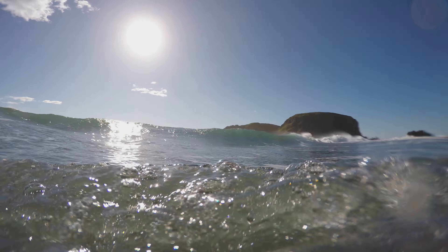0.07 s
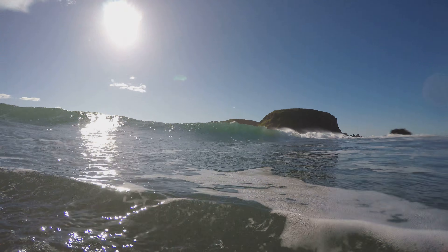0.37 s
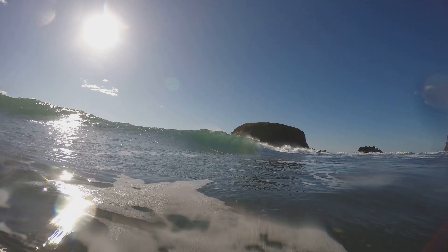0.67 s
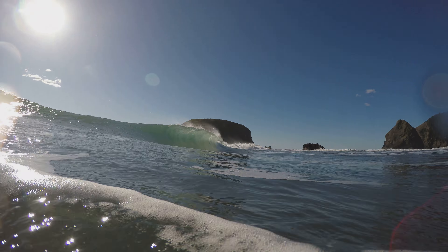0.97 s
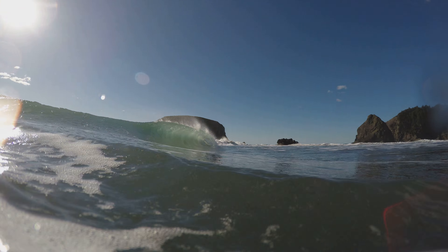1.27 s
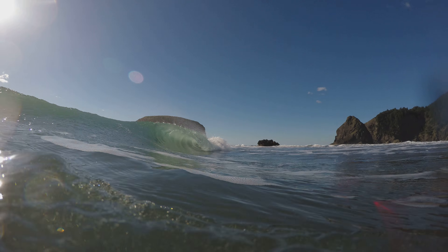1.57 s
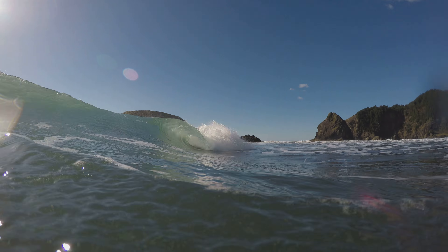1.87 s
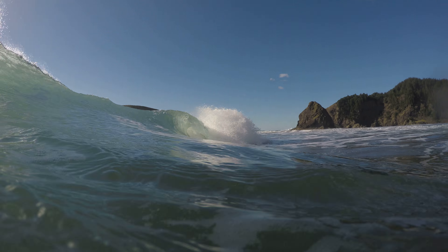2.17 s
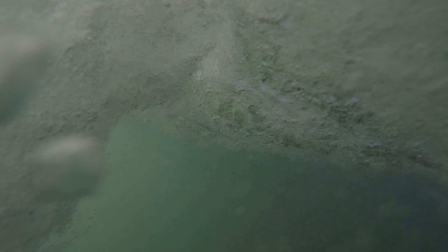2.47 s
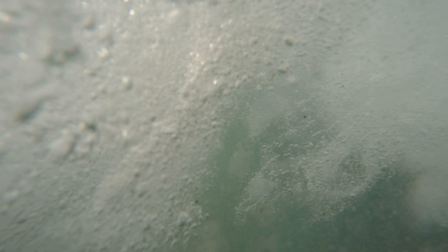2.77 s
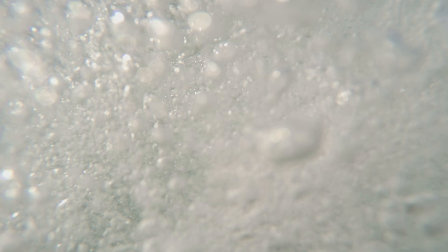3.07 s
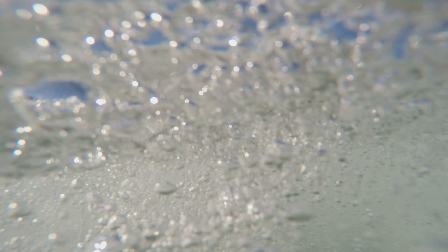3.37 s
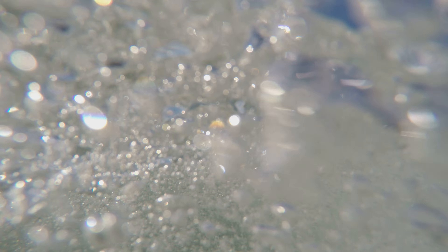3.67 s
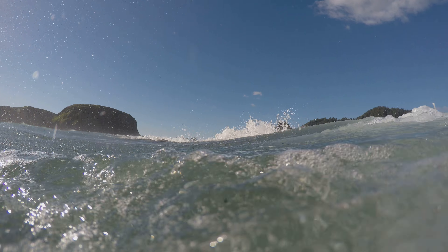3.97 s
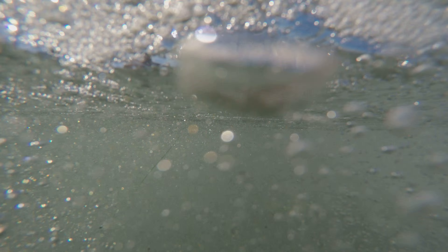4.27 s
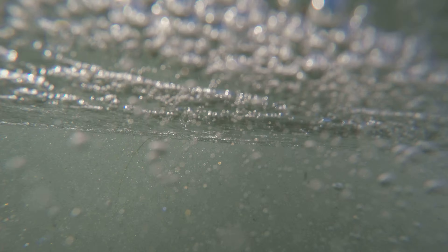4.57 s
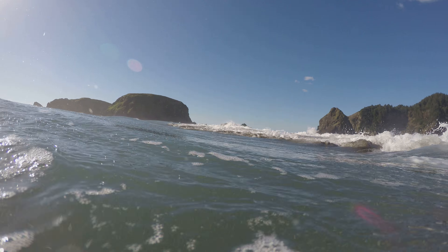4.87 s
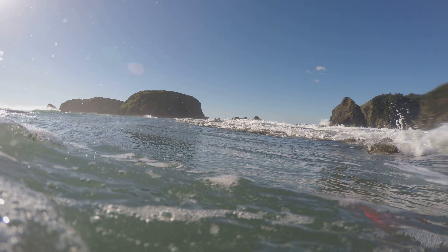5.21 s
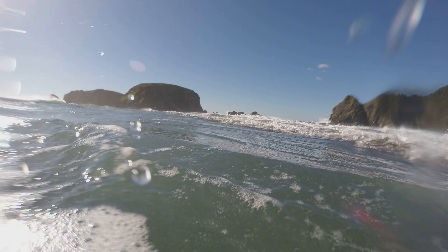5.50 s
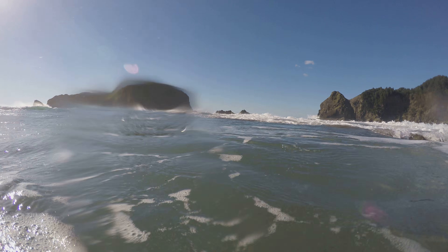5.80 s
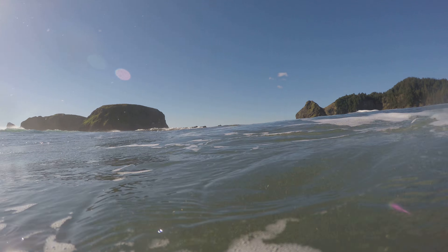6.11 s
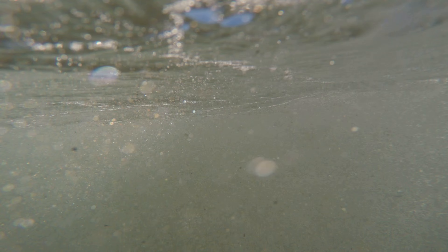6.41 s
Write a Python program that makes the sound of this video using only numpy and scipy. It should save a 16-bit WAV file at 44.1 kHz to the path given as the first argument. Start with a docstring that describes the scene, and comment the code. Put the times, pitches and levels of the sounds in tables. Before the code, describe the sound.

Small ocean ripples slap and plink against a microphone floating in the surf, over a low rumble and the hiss of distant breakers. A wave approaches with a hollow hiss and crashes right on top of it. The microphone goes under several times amid gurgling bubbles, crackling spray and deep thumps. It surfaces into softly fizzing foam, and more water slaps it near the end.

```python
"""A camera floats in the surf off a rocky coast. Over a low rumble and the hiss of distant breakers,
ripples slap its housing and trap ringing air pockets. A wave nears, curls with a hollow hiss and
breaks over it at 2.3 s: spray batters the case, then it is dragged under four times through clouds
of gurgling bubbles. By 5 s it has surfaced among hissing foam, a patch of froth drifts by, and
from 6.1 s more water slaps it as it dips again."""
import sys
import numpy as np
from scipy import signal
from scipy.fft import rfft, irfft
from scipy.io import wavfile

SR = 44100
rng = np.random.default_rng(int(sys.argv[2]) if len(sys.argv) > 2 else 0)


def to_wav(s):
    """Save 16-bit WAV."""
    ch = np.atleast_2d(s).T  # columns
    pcm = np.round(np.clip(ch, -1, 1) * 32767)  # PCM
    wavfile.write(sys.argv[1], SR, pcm.astype(np.int16))


N = 293265
TIME = np.arange(N) / SR


def amp(db):
    """Decibels to gain."""
    return 10 ** (np.asarray(db) / 20)


def unit_rms(x):
    """Scales to rms 1."""
    return x / np.sqrt(np.mean(x ** 2) + 1e-20)


def fader(rows, column=1):
    """Gain over time from one dB column of a curve, silent outside it."""
    rows = np.asarray(rows)
    return amp(np.interp(TIME, rows[:, 0], rows[:, column], left=-140, right=-140))


def swells(table, column, rise_s, sag_db_per_s, fall_s):
    """Gain for rows (time, length, levels): each rises 60 dB in rise_s, sags, falls 60 dB in fall_s."""
    power = np.zeros(N)
    for row in table:
        t, length = TIME - row[0], row[1]
        fade = np.maximum(-t / rise_s, 0) + np.maximum((t - length) / fall_s, 0)
        near = fade < 2
        sag_db = sag_db_per_s * np.clip(t[near], 0, length)
        power[near] += amp(row[column] - sag_db - 60 * fade[near]) ** 2
    return np.sqrt(power)


def add(mix, start_s, sound):
    """Mixes a sound in at its cue."""
    part = mix[max(round(start_s * SR), 0):][:len(sound)]
    part += sound[:len(part)]


def filtered(x, order, hz, kind):
    """Butterworth filter."""
    return signal.sosfilt(signal.butter(order, hz, kind, fs=SR, output="sos"), x)


def equalised(x, eq):
    """Minimum-phase EQ that rolls off 18 dB an octave past the curve's ends; output at rms 1."""
    hz, db = np.transpose(eq)
    octave = np.log2(abs(np.fft.fftfreq(8192, 1 / SR)) + 1)
    points = np.log2(hz)
    beyond = abs(octave - np.clip(octave, points[0], points[-1]))
    gain_db = np.maximum(np.interp(octave, points, db) - 18 * beyond, -100)
    spectrum = np.exp(np.conj(signal.hilbert(np.log(amp(gain_db)))))
    taps = np.fft.ifft(spectrum).real
    return unit_rms(signal.oaconvolve(x, taps[:len(taps) // 2])[:N])


def wander(rate_hz):
    """Smooth random modulation of rms 1."""
    rolloff = 1 + (np.fft.rfftfreq(N, 1 / SR) / rate_hz) ** 4
    return unit_rms(irfft(rfft(rng.standard_normal(N)) / rolloff, N))


def impacts(per_s, spread_db):
    """Random clicks, most small and a few large."""
    size = amp(spread_db * np.minimum(rng.exponential(1, N), 4))
    return size * rng.choice([-1, 1], N) * (rng.random(N) < per_s / SR)


def ping(hz, t60, rise, attack):
    """An air pocket or a struck case rings down, gliding up from hz; a higher attack is snappier."""
    t = np.arange(int(SR * (t60 + .002))) / SR
    turns = hz * t * (1 + rise * t / t60)
    onset = 1 - np.exp(-(attack * hz * t) ** 2)
    return np.sin(2 * np.pi * turns) * np.exp(-np.log(1000) * t / t60) * onset


def bubbles(from_hz, to_hz, per_s, cycles, rise, spread_db, sizes):
    """A bubble cloud: each size fires at random and rings for its own random multiple of cycles."""
    cloud = np.zeros(N)
    for hz, stretch in zip(np.geomspace(from_hz, to_hz, sizes), rng.uniform(0.35, 3.0, sizes)):
        ring = unit_rms(ping(hz, cycles * stretch / hz, rise, attack=1.64))
        cloud += signal.oaconvolve(impacts(per_s / sizes, spread_db), ring * hz / np.sqrt(stretch))[:N]
    return unit_rms(cloud)


# the camera goes under four times: (time [s], length [s], gurgle level [dB], rumble level [dB])
DUNKS = [(2.37, 0.55, -21.5, -17), (3.115, 0.35, -29, -30.5), (3.5, 0.24, -29, -46),
         (4.16, 0.46, -38.5, -43)]


def dunk_envelopes():
    """Gains of the bubble churn and the eddies: both calm during a dunk, and the eddies linger."""
    churn = swells(DUNKS, 2, rise_s=0.17, sag_db_per_s=11.5, fall_s=0.48)
    eddies = swells(DUNKS, 3, rise_s=0.17, sag_db_per_s=7.5, fall_s=2.4)
    return churn, eddies


# low bed of water flowing past the housing: (time [s], level [dB])
FLOW = [(.126, -39.5), (.5, -40), (.75, -50), (1.3, -45), (2.0, -48), (4.1, -45), (6.0, -52.5), (6.3, -49),
        (6.65, -38)]
# its sub-heavy tone: (frequency [Hz], gain [dB])
RUMBLE_EQ = [(12, -15.5), (20, 5), (49, -3), (134, -12.5), (207, -16.5), (259, -22.5), (350, -22.5),
             (460, -35), (770, -120)]


def rumble():
    """Eddies press on the case as a lumpy rumble, hardest under water."""
    _, eddies = dunk_envelopes()
    lumpy = rng.standard_normal(N) * amp(2 * wander(29))
    return equalised(lumpy, RUMBLE_EQ) * np.hypot(fader(FLOW), eddies)


# airborne surf as the wave nears, and once it has passed: (time [s], body fader [dB], fizz level [dB])
SURF_AHEAD = [(.126, -48, -68), (.3, -51, -58), (.66, -56.5, -63.5), (1.2, -54, -65), (1.4, -45, -62),
              (1.7, -46, -61), (2.2, -43.5, -61), (2.27, -37.5, -38), (2.35, -31, -48)]
SURF_BEHIND = [(3.75, -43, -71), (4.0, -46, -53.5), (4.72, -45.5, -54), (5.3, -45.5, -56.5),
               (5.52, -47.5, -52.5), (5.8, -53, -57.5), (6.1, -53, -59), (6.4, -43, -56),
               (6.65, -61.5, -72)]
# tone of each wash, and of the fizz on top: (frequency [Hz], gain [dB])
AHEAD_EQ = [(100, 1.5), (300, 1), (600, -4), (1000, 1.5), (1350, -1.5), (1900, 2), (2270, 0), (2600, 1),
            (3000, -5.5), (4200, -6.5), (5200, -20), (6200, -27.5), (7300, -19.5), (9000, -28.5)]
BEHIND_EQ = [(100, 6), (350, 4), (600, -1), (1000, 8), (1300, 0), (1800, 6), (2400, 3), (3200, -10),
             (4500, -4.5), (5500, -69), (7000, -15), (9000, -44)]
FIZZ_EQ = [(5000, -6.5), (7300, -22.5), (9000, -19), (13000, -16.5), (15000, -29), (16000, -9)]
MUFFLE_DB = -48.5  # churn at this level ducks the surf behind the wave by half


def surf():
    """Distant breakers hiss smoothly, with near foam ticking over them; going under shuts them out."""
    ticks = amp(-5) * bubbles(1200, 4800, per_s=400, cycles=9, rise=.1, spread_db=3, sizes=16)
    grainy = rng.standard_normal(N) + amp(-6) * unit_rms(impacts(1500, spread_db=2.5))
    fizz = equalised(grainy, FIZZ_EQ)
    beds = []
    for ride, eq in (SURF_AHEAD, AHEAD_EQ), (SURF_BEHIND, BEHIND_EQ):
        flutter = amp(wander(30))
        wash = amp(3) * equalised(rng.standard_normal(N) * flutter, eq)
        beds.append(fader(ride) * (wash + ticks) + fader(ride, column=2) * fizz)
    ahead, behind = beds
    churn, _ = dunk_envelopes()
    return ahead + behind / (1 + churn / amp(MUFFLE_DB))


# white water washes over the case: (time [s], length [s], crackle level [dB], spray fader [dB])
SPLASHES = [(.13, .24, -45, -69), (.44, .09, -38.5, -53.5), (1.21, 0.046, -50, -59),
            (1.28, 0.0094, -25, -55), (2.3, .03, -21.5, -51), (2.345, .05, -22, -48),
            (2.43, 0.1, -25.5, -51), (2.53, 0.049, -24, -53), (2.64, 0.015, -28, -66),
            (2.75, 0.23, -27.5, -56), (3.01, 0.081, -35, -67), (3.34, 0.088, -42.5, -76),
            (3.56, 0.016, -44, -72), (3.635, 0.041, -22, -54), (3.735, 0.014, -29.5, -60),
            (3.83, 0.43, -44, -72), (4.3, 0.049, -61, -70), (6.12, 0.067, -37.5, -72), (6.2, .08, -41, -61),
            (6.59, 0.018, -37, -62)]
# tone of the midrange crackle and the airy spray: (frequency [Hz], gain [dB])
CRACKLE_EQ = [(500, -58), (1000, -2.5), (1700, 2), (2600, 0), (3200, -5.5), (4000, -4), (6000, -27),
              (10000, -30)]
SPRAY_EQ = [(3000, -10), (6000, -4), (8000, -11), (11000, -14.5), (15000, -16)]


def foam():
    """Small bubbles and droplets burst on the case in bunches, with each splash and each dunk."""
    bunches = amp(2 * wander(78))
    pops = bubbles(900, 6000, per_s=900, cycles=14, rise=.08, spread_db=4, sizes=24)
    clicks = amp(-6) * unit_rms(impacts(1500, spread_db=2.5))
    crackle = equalised(bunches * (pops + clicks), CRACKLE_EQ)
    mist = bubbles(3500, 14000, per_s=1200, cycles=14, rise=.05, spread_db=4, sizes=16)
    spray = amp(7.5) * equalised(bunches * mist, SPRAY_EQ)
    churn, _ = dunk_envelopes()
    mix = np.zeros(N)
    for layer, column, underwater_db in (crackle, 2, -15), (spray, 3, -39.5):
        splash = swells(SPLASHES, column, rise_s=0.032, sag_db_per_s=33, fall_s=0.096)
        mix += layer * np.hypot(splash, churn * amp(underwater_db))
    return mix


# a light sprinkle on the case: (time [s], level [dB])
DROPLETS = [(.13, -60), (.7, -68), (2.1, -67), (2.5, -52), (4.4, -60), (5.3, -54), (5.8, -64), (6.65, -61)]


def droplets():
    """Stray drops and lone foam bubbles tick softly on the case."""
    ticks = bubbles(1500, 7500, per_s=220, cycles=15, rise=.1, spread_db=2.5, sizes=14)
    return unit_rms(filtered(ticks, 2, 4500, "low")) * fader(DROPLETS)


# foreground water slaps: (time [s], pocket pitch [Hz], pocket level [dB], pocket t60 [s],
# knock pitch [Hz], knock level [dB], pre-filter snap level [dB])
SLAPS = [(.1378, 2125, -10, 0.015, 2190, 0.5, -32), (0.158, 7400, -26.5, 0.0088, 3640, -20, -40),
         (0.164, 3710, -11.5, .012, 2650, -4, -39), (0.187, 4170, -20.5, .02, 1450, -29, -47),
         (0.4392, 930, 12.5, 0.0038, 2290, -9.5, -26), (0.4753, 1050, -3.5, 0.007, 2120, 2.5, -36),
         (.949, 830, -24, 0.02, 1090, -27, -55), (.9806, 2370, -32, 0.019, 1470, -37, -47),
         (0.9894, 955, -16.5, 0.02, 900, -9.5, -53.5), (1.0287, 1020, -25.5, 0.033, 760, -21.5, -52),
         (1.071, 1040, -23.5, .017, 4160, -30, -42), (1.165, 1010, -14.5, 0.023, 1940, -3.5, -24),
         (1.176, 1420, -4.5, 0.0074, 3900, -5, -50), (1.231, 1080, -14, 0.0095, 2250, -6, -13),
         (1.2451, 1030, -3, 0.02, 2670, 0.5, -20), (1.2475, 910, -14.5, 0.061, 1600, -8, -45),
         (1.2758, 1000, -35, 0.012, 1950, 1, -45), (1.2788, 1125, 6, 0.014, 3800, 0, -23),
         (1.289, 2710, -3, 0.0095, 980, -4, -26), (1.2935, 533, -14.5, 0.077, 690, -2.5, -13),
         (1.3075, 1520, -7.5, 0.028, 2290, -10, -28), (1.3066, 2260, -10, 0.021, 2700, -13, -45),
         (2.1824, 620, -18.5, 0.058, 1160, -5.5, -38), (2.3318, 2130, 18.5, 0.002, 4970, 11, -11),
         (2.3348, 1950, -10, 0.0045, 4330, 14, 2), (2.3548, 1060, 1.5, 0.01, 2620, -8, -18),
         (2.418, 1670, -2, 0.0097, 4570, 8.5, -7), (2.4405, 2500, -4, 0.018, 1700, -5, -27),
         (2.4535, 2520, 0.5, 0.0069, 1500, -10, -28), (2.4973, 630, -2.5, 0.024, 1060, 0.5, -37),
         (2.7849, 740, -1.5, .014, 2870, -9, -38), (2.8183, 1110, 1, 0.0018, 2460, -3, -24),
         (2.8764, 4040, -5, 0.0036, 1840, -2, -27), (2.9106, 490, -14, .009, 1610, 0.5, -23),
         (2.9232, 644, 9, .0038, 1570, -3, -25), (2.9425, 3680, -15, 0.014, 2200, -1.5, -50),
         (2.9883, 4000, 3.5, 0.0027, 1930, -3.5, -34), (3.1876, 580, 4, 0.015, 1350, -9, -45),
         (3.3227, 780, 0.5, 0.0071, 2470, -2, -49), (3.3454, 900, -13, 0.036, 1730, -8, -52),
         (3.3623, 1220, -9, 0.016, 1530, -7, -52), (3.364, 1620, -13.5, 0.028, 900, -14, -50),
         (3.4887, 1150, -13, .007, 4200, -18, -42), (3.5081, 3570, 7, 0.0055, 640, 0.5, -12),
         (3.5508, 579, -8.5, 0.15, 2450, -37, -50), (3.5636, 575, -11, 0.074, 2790, -8, -16),
         (3.5755, 5900, -20, .007, 2680, -5.5, -30), (3.6164, 2280, -6, 0.015, 1210, -2, -23),
         (3.638, 3520, -12, .012, 1490, -12, -27), (3.644, 1505, -7.5, 0.028, 2200, -17, -40),
         (3.6609, 1050, 4, 0.018, 654, 5, -15), (3.6792, 660, -3, 0.032, 970, 1.5, -33),
         (3.701, 3140, 2, 0.0044, 3560, 6, -35), (3.73, 2690, 3, 0.0095, 550, -12, -37),
         (3.7394, 1036, .5, 0.0048, 5340, 4, -48), (3.7533, 6340, -10.5, .005, 2500, -15, -38),
         (3.828, 2010, -11, 0.0063, 1550, -9, -38), (3.9452, 976, 3, 0.0078, 2930, -1, -21),
         (4.0036, 6600, -7, 0.0017, 1750, -15.5, -42), (4.1701, 800, -14.5, 0.02, 3000, -17, -41),
         (4.212, 2780, -4.5, 0.0087, 800, -14.5, -33), (4.3103, 12300, -12.5, 0.0031, 2840, -14.5, -16),
         (4.346, 2850, -9.5, 0.006, 5160, -2, -5), (4.3654, 1180, 7.5, 0.0018, 4430, -16, -22),
         (5.2542, 1540, -9, 0.016, 966, -9.5, -43), (5.4926, 780, 20.5, 0.0012, 1680, -17, -48),
         (6.1132, 1190, -13.5, .02, 1267, -9, -39), (6.1475, 1070, -12, 0.032, 2070, -5.5, -15),
         (6.1521, 1616, -3, 0.022, 1010, -3, -28), (6.2155, 990, -21.5, 0.03, 3170, -2, -27),
         (6.2263, 1940, -7, 0.0096, 1110, -26, -44), (6.2294, 1680, -6, 0.0095, 1110, -28, -32),
         (6.2667, 800, 12, 0.0041, 1310, 0.5, -47), (6.2691, 943, 6.5, 0.013, 2310, -5, -4),
         (6.2725, 1060, 21, 0.0038, 2080, 10, -28), (6.2805, 3960, -6, 0.0067, 970, -5, -19),
         (6.2973, 626, 2, 0.0049, 3080, -6, -9), (6.3027, 930, -13, 0.017, 400, -19, -48),
         (6.3165, 905, -3, 0.007, 2650, -30, -42), (6.3199, 2450, -14, 0.029, 1040, -9, -48),
         (6.4793, 692, 0, 0.054, 1370, 16, -22), (6.4991, 3600, -4.5, 0.0032, 724, -28, -28),
         (6.5103, 1085, -11, 0.034, 630, -5, -40), (6.531, 2620, -25, 0.025, 880, -11.5, -50),
         (6.5438, 4150, -22, .005, 2480, -29, -16), (6.589, 3450, -13, .0021, 920, -17.5, -36),
         (6.6103, 2520, -6.5, 0.021, 3600, 8.5, -34), (6.6113, 863, -8, 0.02, 1070, -2, -45),
         (6.6338, 2360, -25, 0.016, 3600, -21, -50)]
KNOCK_CYCLES = 6.53  # a knock dies within a few cycles, whatever its pitch


def slaps():
    """Each slap knocks and snaps on the case, rings it and an air pocket, and leaves a short splatter."""
    rings, snaps = np.zeros(N), np.zeros(N)
    case_ring = amp(-20.5) * ping(hz=1036, t60=.035, rise=.005, attack=0.68)
    t = np.arange(400) / SR
    for start, pocket_hz, pocket_db, pocket_t60, knock_hz, knock_db, snap_db in SLAPS:
        pocket = ping(pocket_hz, pocket_t60, rise=0.0022, attack=1.09)
        knock = ping(knock_hz, KNOCK_CYCLES / knock_hz, rise=0.0081, attack=1.76)
        snap = rng.standard_normal(len(t)) * t * np.exp(-t / 0.00035)
        add(rings, start, amp(pocket_db) * pocket)
        add(rings, start, amp(knock_db) * knock)
        add(rings, start, amp(min(knock_db, pocket_db)) * case_ring)
        add(snaps, start, amp(snap_db) * snap / abs(snap).max())
    direct = rings + filtered(snaps, 1, [3500, 13000], "band")
    t = np.arange(3000) / SR
    splatter = rng.standard_normal(len(t)) * np.exp(-t / 0.0018) * (1 - np.exp(-t / 0.0037))
    splatter = filtered(splatter, 2, 1100, "high")  # droplets carry no bass
    return direct + amp(-12) * signal.oaconvolve(direct, splatter / np.linalg.norm(splatter))[:N]


# ripples lap at the case: (time [s], length [s], level [dB])
LAPS = [(.17, 0.45, -42.5), (.95, 0.31, -47), (4.2, 0.78, -51.5), (6.19, 0.061, -43), (6.33, .12, -46.5),
        (6.53, 0.15, -39)]


def lapping():
    """Ripples trap small air pockets that plink one after another."""
    plinks = bubbles(644, 2600, per_s=260, cycles=20, rise=0.15, spread_db=9, sizes=20)
    return plinks * swells(LAPS, 2, rise_s=0.032, sag_db_per_s=0, fall_s=0.096)


# gulps of air torn under the surface: (centre time [s], length [s], level [dB], centre pitch [Hz])
GULPS = [(0.317, 0.24, -45.5, 866), (0.519, 0.033, -42, 960), (2.611, 0.066, -19.5, 251),
         (2.628, 0.086, -18.5, 510), (2.678, 0.037, -22.5, 614), (2.924, 0.074, -35, 285),
         (3.001, 0.0306, -36.5, 575), (3.148, .14, -26, 580), (4.424, 0.063, -42, 830),
         (6.244, 0.12, -42, 1130)]
# throaty tone of the underwater churn: (frequency [Hz], gain [dB])
CHURN_EQ = [(150, -8), (260, -3), (380, -5.5), (600, 1), (950, -0.5), (1400, -11.5), (2500, -10.5)]


def gurgle():
    """Gulps of air shatter into clusters of like-sized bubbles; large bubbles churn during the dunks."""
    cloud = bubbles(174.1, 2140, per_s=1600, cycles=25.4, rise=0.276, spread_db=4.5, sizes=36)
    churn, _ = dunk_envelopes()
    mix = equalised(cloud, CHURN_EQ) * churn
    for centre, length, db, hz in GULPS:
        cluster = np.zeros(int(SR * (length + .1)))
        count = int(400 * length) + 4
        for scatter, detune, strength in rng.standard_normal((count, 3)):
            ring = ping(hz * 2 ** (0.18 * detune), t60=0.028, rise=0.11, attack=4.9)
            add(cluster, length * (.5 + scatter / 4), strength * ring)
        cluster *= np.sqrt(length * SR) / np.linalg.norm(cluster)  # rms 1 over the gulp's length
        add(mix, centre - length / 2, amp(db) * cluster)
    return mix


# one tiny, high chirp of draining water: (time [s], pitch [Hz], level [dB])
SQUEAK = [(.245, 11400, -53), (0.251, 9750, -25.5), (0.254, 7100, -24.5), (.26, 6300, -54)]


def squeak():
    """A film of water drains with a thin, unsteady, falling whistle."""
    times, hz, _ = np.transpose(SQUEAK)
    pitch = np.interp(TIME, times, hz) * (1 + 0.049 * wander(1600))
    return np.sin(2 * np.pi * np.cumsum(pitch) / SR) * fader(SQUEAK, column=2)


# low thumps of water on the housing: (time [s], level [dB], starting pitch [Hz], t60 [s])
SHOVES = [(0.442, -6.5, 116, 0.012), (0.476, -9.5, 40, 0.091), (1.052, -25.5, 42.5, 0.14),
          (1.181, -30, 110, .025), (1.281, -21, 139, .025), (2.376, 10, 93, 0.0076),
          (2.408, -2.5, 87, 0.15), (2.614, 1.5, 51, 0.13), (2.991, -10, 48.3, 0.091),
          (3.508, -18.5, 106, 0.057), (3.68, -18.5, 103, 0.055), (6.296, -17, 95.5, 0.06),
          (6.307, -16, 37.6, 0.11), (6.476, -25, 40, 0.088)]


def shoves():
    """Heavy shoves of water rock the housing for a few cycles."""
    thumps = np.zeros(N)
    for start, db, hz, t60 in SHOVES:
        add(thumps, start, amp(db) * ping(hz, t60, rise=0.37, attack=21))
    return thumps


# the nearing wave curls over: (time [s], length [s], level [dB])
CURL = [(1.68, 0.64, -38)]
# its hollow tone: (frequency [Hz], gain [dB])
CURL_EQ = [(1850, -9), (2280, 10), (2700, -14), (3150, -12), (4100, -3.5), (6100, -20), (7350, -28),
           (9000, -33)]


def curl():
    """The hollow of the breaking wave colours its hiss with a few broad resonances."""
    hiss = equalised(rng.standard_normal(N), CURL_EQ)
    return hiss * swells(CURL, 2, rise_s=0.76, sag_db_per_s=14, fall_s=0.73)


# the big hit, as the lip of the wave lands: (time [s], level [dB])
CRASH = [(2.326, -71), (2.332, -13), (2.36, -12), (2.385, -10.5), (2.40, -14.5), (2.445, -25.5),
         (2.475, -30)]
# its hard, bright tone: (frequency [Hz], gain [dB])
CRASH_EQ = [(240, -41), (400, -42), (653, -21), (761, -21), (900, -2), (1380, -8), (1540, -3), (2710, 2.5),
            (3110, -7), (5230, -3), (5910, -7), (13300, -19), (15500, -18)]


def crash():
    """Sheets of water batter the case in bursts a few milliseconds long."""
    blows = impacts(7000, spread_db=6) * amp(4 * wander(180))
    return equalised(blows, CRASH_EQ) * fader(CRASH)


# a patch of froth drifts by: (time [s], level [dB])
FROTH = [(5.08, -85), (5.14, -33.5), (5.17, -42), (5.22, -32.5), (5.26, -38), (5.31, -46)]


def froth():
    """Tightly packed bubbles of nearly one size pop in a brief, narrow sizzle."""
    pops = bubbles(1880, 1700, per_s=1300, cycles=5.3, rise=0.039, spread_db=2.5, sizes=10)
    return pops * fader(FROTH)


def scene():
    """All the water, mixed to mono."""
    sea = rumble() + surf() + foam() + droplets()
    close_water = slaps() + lapping() + gurgle() + squeak() + shoves()
    wave = curl() + crash() + froth()
    return (sea + close_water + wave)[None]


def record(dry):
    """The microphone passes no steady pressure, soft-clips the loudest blows and loses the very top."""
    dry = filtered(dry, 1, 12, "high")
    clipped = dry / (1 + dry ** 6) ** (1 / 6)
    high_cut = signal.firwin(255, 15800, window=("kaiser", 8), fs=SR)
    return signal.oaconvolve(clipped, high_cut[None], "same")


dry = scene()
out = record(dry)
to_wav(out)
```